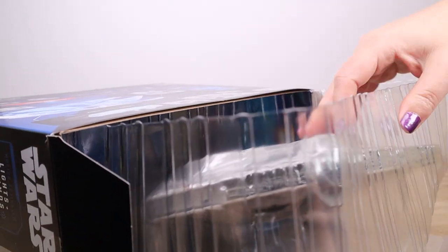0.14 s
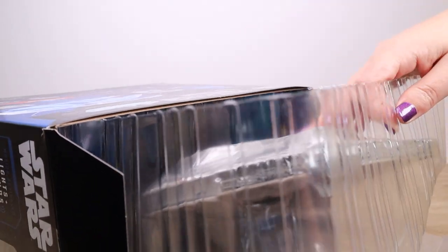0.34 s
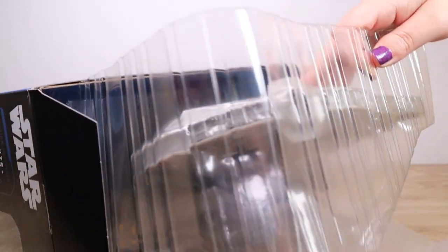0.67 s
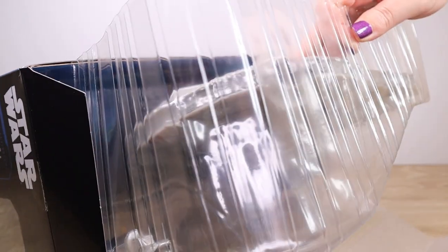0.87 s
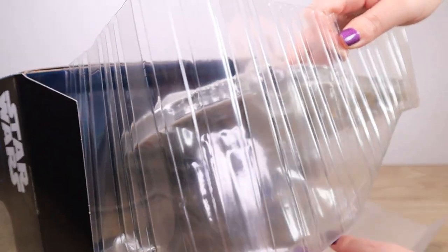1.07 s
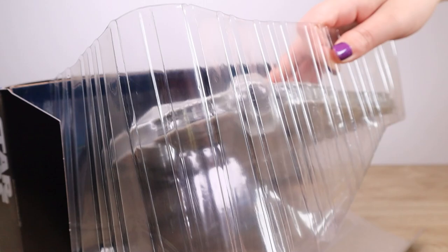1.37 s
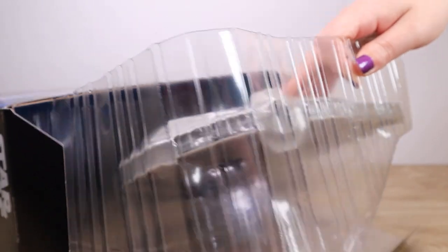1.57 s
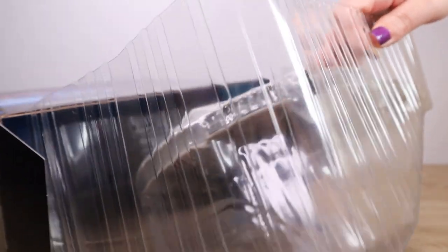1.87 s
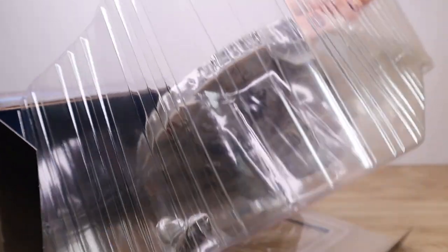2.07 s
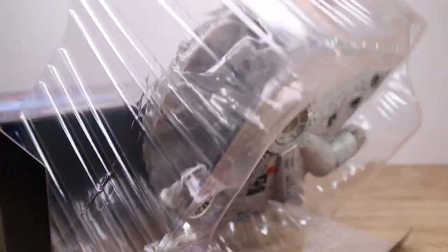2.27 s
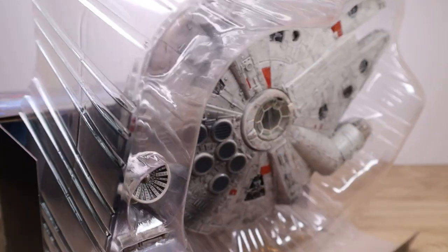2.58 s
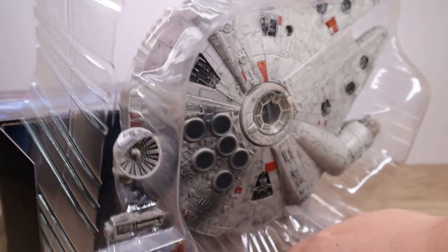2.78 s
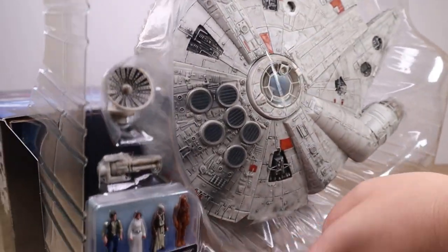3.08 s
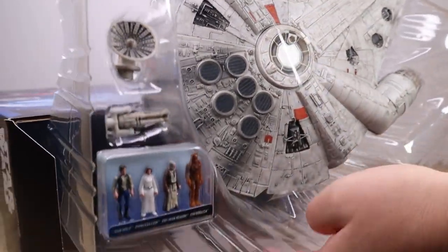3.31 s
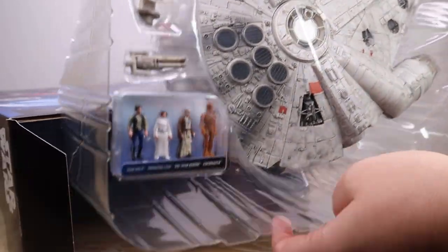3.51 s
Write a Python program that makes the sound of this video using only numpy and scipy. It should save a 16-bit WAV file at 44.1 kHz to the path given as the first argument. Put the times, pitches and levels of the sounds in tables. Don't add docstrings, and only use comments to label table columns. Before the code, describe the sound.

A thin plastic tray is pulled from a cardboard box: faint ticks and one sharp click, then louder scraping and popping, a brief lull, and hard final snaps; close microphone, small room.

```python
import sys
import numpy as np
from scipy import signal
from scipy.fft import rfft, irfft
from scipy.io import wavfile

SR = 44100
rng = np.random.default_rng(int(sys.argv[2]) if len(sys.argv) > 2 else 0)


def transcribe(signal):
    frames = np.atleast_2d(signal).T
    limited = np.clip(frames, -1, 1)
    pcm = np.round(limited * 32767).astype(np.int16)
    wavfile.write(sys.argv[1], SR, pcm)


def undo_db(level):
    steps = np.asarray(level, float) / 20
    return 10 ** steps


N = 160965
SPAN = 8192
SLIPS_PER_S = 6000
BOX_FLOOR_HZ = 194
SHINE_TOP_HZ = 7120


def ring(x, hz, width):
    b, a = signal.iirpeak(hz, hz / max(width, 4), fs=SR)
    return signal.lfilter(b, a, x)


def body(x, peaks):
    return sum((-1) ** k * undo_db(db) * ring(x, hz, w) for k, (hz, w, db) in enumerate(peaks))


def band(x, kind, hz, order=2):
    return signal.sosfilt(signal.butter(order, hz, kind, fs=SR, output="sos"), x)


def level(x, db, size=None):
    return x * undo_db(db) / np.sqrt(np.mean(x[:size] ** 2) + 1e-18)


def slips(shape, rate):
    chance, sign, size = np.moveaxis(rng.random(shape + (3,)), -1, 0)
    spread_db = 2
    return (chance < rate / SR) * np.sign(sign - .5) * undo_db(-spread_db * np.log(1 - size))


def add(out, s, x):
    i = max(int(s * SR), 0)
    out[i:i + len(x)] += x[:N - i]


# frequency in Hz, density in dB per Hz.
AIR_SPECTRUM = [(30, -22), (110, 13.5), (300, 3), (900, 7), (2700, -1), (6500, -7.5), (8500, -15.5),
                (15500, -22)]


def air():
    curve_hz, curve_db = np.array(AIR_SPECTRUM).T
    log_hz = np.log(np.arange(N // 2 + 1) * SR / N + 1)
    gain = undo_db(np.interp(log_hz, np.log(curve_hz), curve_db))
    hiss = level(irfft(rfft(rng.standard_normal(N)) * gain, N), -57.5)
    flicker = level(band(rng.standard_normal(N), "low", 42), 0)
    hum = undo_db(-67.5) * np.sin(2 * np.pi * 47.8 * np.arange(N) / SR)
    return hiss * undo_db(2.0 * flicker) + hum


def room(x):
    treble_t60_s, bass_t60_s = 0.25, 0.57
    build_s, early_end_s, early_fade_s = 0.016, 0.068, 0.0062
    room_db, late_db = -9, -20.5
    t = np.arange(SPAN) / SR
    noise = rng.standard_normal(SPAN)
    treble = band(noise, "high", 1240) * undo_db(-60 * t / treble_t60_s)
    bass = band(noise, "low", 815) * undo_db(-60 * t / bass_t60_s)
    early = 1 / (1 + np.exp(np.clip((t - early_end_s) / early_fade_s, -30, 30)))
    tail = (treble + bass) * np.clip(t / build_s, 0, 1) * (undo_db(late_db) + early)
    return signal.fftconvolve(x, tail * undo_db(room_db) / np.sqrt(np.sum(tail ** 2)))[:N]


# frequency in Hz, width in Hz, gain in dB.
WALL_MODES = [(215, 185, -8), (270, 135, -1), (346, 111, -1), (384.7, 72, -3.5), (510, 76, -5)]


def walls(x):
    return band(body(x, WALL_MODES), "high", BOX_FLOOR_HZ, order=4)


# frequency in Hz, width in Hz, gain in dB.
BOTTOM_MODES = [(92, 41, -7.5), (135.6, 71, 2), (167.7, 89, 1.5)]


def bottom(x):
    return band(body(x, BOTTOM_MODES), "high", 85, order=3)


# time in seconds, level in dB.
DRAG_LEVELS = [(0, -57.5), (.14, -59.5), (.5, -65.5), (.93, -61), (1.25, -64.5), (1.55, -57.5), (1.66, -36),
               (1.8, -40), (2.1, -40.5), (2.4, -36), (2.48, -27), (2.7, -48.5), (2.82, -66.5),
               (3.18, -56.5), (3.3, -49), (3.46, -44.5), (3.55, -52), (3.62, -32.5)]


def drag():
    push = slips((N,), 900)
    wall = level(ring(band(walls(push), "low", 600), 355.5, 180), 0)
    boom = level(bottom(push), -14.5)
    plate = level(band(body(push, TRAY_MODES), "low", 1500), -12)
    times, levels_db = np.array(DRAG_LEVELS).T
    return (wall + boom + plate) * undo_db(np.interp(np.arange(N) / SR, times, levels_db))


# time in seconds, wall peak in dB, wall ring in Hz, bottom level in dB.
BOX_THUMPS = [(0.241, -34.5, 343, -44), (0.261, -24.5, 333, -33.5), (1.413, -27.5, 346, -38),
              (2.15, -36, 296, -32), (2.371, -37, 300, -27.5), (2.49, -25, 385, -46),
              (2.512, -29, 400, -10), (2.57, -37, 286, -14.5), (2.796, -37, 313, -43),
              (3.052, -33, 277, -42.5), (3.247, -20.5, 312, -61), (3.276, -14, 236, -55),
              (3.298, -15.5, 310, -17), (3.354, -22, 268, -16.5), (3.418, -29, 354, -20),
              (3.592, -7.5, 278, -16.5), (3.611, -10, 269, -18.5)]


def thumps():
    out, t = np.zeros(N), np.arange(SPAN) / SR
    thump_s, lead_s = 0.015, 0.006
    n = int(2 * thump_s * SR)
    for (s, db, hz, bottom_db), x in zip(BOX_THUMPS, rng.standard_normal((len(BOX_THUMPS), SPAN))):
        push = x * t * np.exp(-2 * t / thump_s)
        wall = ring(ring(push, hz, 107), hz, 205) + 0.49 * walls(push)
        boom = bottom(band(push, "low", 127))
        add(out, s - lead_s, level(wall, db - 11.5, n) + level(boom, bottom_db - 21, 2 * n))
    return out


def wavelets(rows, cycles, gain_db):
    out, t = np.zeros(N), np.arange(SPAN // 4) / SR
    for s, db, hz in rows:
        u = t * hz / cycles
        swell = u * np.exp(1 - u)
        add(out, s - cycles / hz, undo_db(db + gain_db) * swell * np.sin(2 * np.pi * hz * t))
    return out


# time in seconds, peak in dB, ring in Hz.
WALL_CATCHES = [(1.6915, -24.9, 352), (1.7139, -24, 406), (1.7262, -30.5, 430), (1.7531, -37, 337),
                (1.8484, -24, 360), (1.8696, -34, 327), (1.8968, -21, 368), (1.9152, -22.5, 366),
                (1.9956, -41, 394), (2.0198, -24.5, 404), (2.0542, -34.5, 405), (2.0998, -26.6, 376),
                (2.1227, -23.1, 350), (2.1467, -26.5, 401), (2.1728, -33, 352), (2.1916, -28, 330),
                (2.2096, -25.4, 386), (2.2361, -34, 330), (2.2573, -28, 304), (2.2706, -29, 393),
                (2.296, -32, 355), (2.3165, -33.5, 328), (2.3411, -30, 326), (2.3596, -23, 304),
                (2.3816, -34, 392), (2.4089, -21, 346), (2.4455, -28, 380), (2.4971, -20.9, 367),
                (2.5222, -16, 341), (2.5468, -31, 383), (2.5722, -24.5, 304), (2.5994, -36, 317)]


def catches():
    return band(wavelets(WALL_CATCHES, 1.807, -1), "high", BOX_FLOOR_HZ, order=4)


# frequency in Hz, width in Hz, gain in dB.
CLINK_MODES = [(2184, 140, -3.5), (3020, 160, -10), (3740, 115, -1.5), (4700, 55, -13), (6300, 210, -10.5)]


def clink():
    out, t = np.zeros(N), np.arange(SPAN) / SR
    clink_s = 0.013
    rattle = band(slips((SPAN,), 2 * SLIPS_PER_S), "low", SHINE_TOP_HZ)
    push = rattle * (t < clink_s) * np.sqrt(t)
    add(out, 1.115, level(body(push, CLINK_MODES), -31.5, int(clink_s * SR)))
    return out


# frequency in Hz, width in Hz, gain in dB.
SHINE_MODES = [(2380, 1000, 11), (3158, 1360, 13.5), (3650, 734, 13), (4200, 1300, 2), (5650, 1510, 8.5),
               (6190, 2870, 3), (6530, 410, -18)]


def shine(push, db):
    crisp = band(body(band(push, "high", 2070), SHINE_MODES), "low", SHINE_TOP_HZ, order=8)
    sheen_hz = 11750
    sheen = band(band(push, "high", SHINE_TOP_HZ), "low", sheen_hz, order=8)
    sheen = sheen + 0.056 * band(push, "high", sheen_hz)
    sheen_db = -21.5 + 0.025 * (db + 37)
    return crisp - undo_db(sheen_db) * sheen


# time in seconds, peak in dB, ring in Hz.
CREASE_TICKS = [(0.019, -42.5, 2900), (0.4214, -49, 2830), (0.615, -51, 2680), (0.9458, -37, 2310),
                (1.0342, -41, 2050), (1.3678, -43.5, 4000), (0.6102, -40, 1340), (1.7796, -31, 2400),
                (1.8861, -36, 2470), (2.387, -15.5, 4940), (2.412, -16.5, 2850), (2.5225, -26, 2800),
                (2.716, -46.5, 4870), (2.9237, -45, 6400), (3.263, -35, 4750), (3.2966, -23.5, 2380),
                (3.358, -31, 2500), (3.509, -49, 2500), (3.5974, -13.5, 5200), (.2605, -18.5, 5460),
                (3.577, -16.5, 3160), (3.601, -31, 5500), (2.259, -34.5, 3550)]


def ticks():
    out, t = np.zeros(N), np.arange(SPAN // 4) / SR
    tick_s = 0.003
    n = int(2 * tick_s * SR)
    for (s, db, hz), x in zip(CREASE_TICKS, slips((len(CREASE_TICKS), SPAN // 4), 2 * SLIPS_PER_S)):
        push, tick_db = x * np.exp(-t / tick_s), db - 8
        crackle = level(shine(push, tick_db), 0, n)
        crease = level(ring(ring(push, hz, 0.32 * hz), hz, hz / 2), 17, n)
        add(out, s, level(crackle + crease, tick_db, n))
    return out


# time in seconds, peak in dB, ring in Hz.
PANEL_POPS = [(1.632, -23, 1530), (1.7075, -28, 870), (1.7092, -9.5, 2240), (1.7252, -13.5, 1870),
              (2.0, -25, 940), (2.381, -19, 780), (2.3843, -11, 2480), (2.389, -10.5, 844),
              (2.3919, -13, 2460), (2.3968, -8, 810), (2.4003, -11, 1970), (2.4094, -11.5, 1760),
              (2.4163, -11, 2180), (2.4351, -16.5, 940), (2.4446, -22, 1660), (2.4708, -20.8, 780),
              (3.2469, -13, 976), (3.2535, -18.5, 730), (3.265, -12.5, 790), (3.2802, -15.5, 1970),
              (3.282, -27, 830), (3.2912, -8, 818), (3.3202, -26, 734), (3.581, -18, 2920),
              (3.582, -23, 1090), (3.5913, -3.5, 2620), (3.5943, -7.5, 780), (3.5986, -3, 1770),
              (3.6046, -7, 790), (3.6191, -21, 910)]


def pops():
    return wavelets(PANEL_POPS, 1.717, -5)


# frequency in Hz, width in Hz, gain in dB.
TRAY_MODES = [(647.4, 70, 14), (818, 20.3, 18.5), (1036, 12, 15), (1540, 197, 13), (1750, 66, 13.5),
              (2026, 140, 9), (2300, 42, 8.5), (2680, 194, 11)]


def plastic(push, length, db, hz, treble_db):
    n = int(length * SR) + 200
    width = 0.23 * hz
    panel = ring(ring(push, hz, width), hz, 3 * width)
    top_hz = max(1980 * undo_db(0.095 * (db + 23.5)), hz)
    around = band(band(body(push, TRAY_MODES), "high", 0.41 * hz), "low", top_hz)
    low = level(level(panel, 17, n) + level(around, 14.5, n), db, n)
    return low + level(shine(push, treble_db), treble_db, n)


# start in seconds, length in seconds, body in dB, ring in Hz, treble in dB.
TRAY_SCRAPES = [(0.0, 0.034, -51.5, 820, -71), (0.625, 0.033, -50, 1260, -65),
                (0.69, 0.023, -48.5, 720, -83), (0.876, 0.11, -39.5, 800, -51.5),
                (1.112, 0.039, -49.5, 1360, -44.5), (1.422, 0.1, -45.5, 815, -68),
                (1.525, 0.21, -41, 755, -55.5), (1.605, 0.061, -38.5, 1320, -44),
                (1.711, 0.13, -37, 807, -51.5), (1.854, 0.098, -36, 790, -55.5),
                (1.998, 0.013, -51, 870, -85), (2.118, 0.052, -43, 1340, -50.5),
                (2.235, 0.061, -33, 770, -48), (2.289, 0.15, -36.5, 786, -54.5),
                (2.358, 0.071, -22, 800, -29.5), (2.447, 0.12, -33.5, 910, -45.5),
                (2.534, 0.12, -42.5, 750, -60), (2.865, 0.11, -50.5, 1360, -58),
                (3.061, 0.052, -51, 700, -66), (3.203, 0.21, -36.5, 793, -47),
                (3.276, 0.042, -29, 710, -48), (3.334, 0.039, -40.5, 930, -47.5),
                (3.407, 0.09, -48.5, 1350, -62.5), (3.598, 0.046, -27, 760, -60),
                (3.532, 0.12, -47.5, 1370, -62), (1.683, 0.083, -37, 1580, -42),
                (0.725, 0.097, -85, 2610, -80), (1.054, 0.052, -73, 2190, -61.5),
                (2.083, 0.043, -60, 1500, -59), (.89, 0.089, -46.5, 2180, -63)]


def scrapes():
    out, t = np.zeros(N), np.arange(SPAN) / SR
    rows = zip(TRAY_SCRAPES, slips((len(TRAY_SCRAPES), SPAN), SLIPS_PER_S))
    for (s, length, db, hz, treble_db), x in rows:
        rise = t / 0.15
        fall = (length - t) / 0.81 + length / 2
        shape = np.clip(np.minimum(rise, fall) / length, 0, 1)
        add(out, s, plastic(x * shape ** 1.49, length, db, hz, treble_db))
    return out


# time in seconds, treble peak in dB, body level in dB, ring in Hz.
TRAY_SNAPS = [(0.0373, -36.5, -45, 790), (0.0843, -38.5, -37, 1570), (0.145, -51, -51.5, 830),
              (0.1735, -43, -51, 776), (0.2383, -36, -44.5, 1320), (0.2611, -15.5, -27.5, 1290),
              (0.4134, -47, -48.5, 744), (0.4674, -44, -46, 820), (0.6078, -39.5, -42, 1335),
              (0.6739, -38, -44, 818), (0.8601, -46, -50, 1000), (1.033, -39, -54, 2090),
              (1.4107, -39, -35, 780), (1.706, -14, -23, 810), (1.9919, -37.5, -32, 790),
              (2.4354, -17, -21.5, 1370), (2.5114, -26.5, -22, 600), (2.6494, -49, -37.5, 610),
              (2.6764, -51, -44.5, 620), (2.6998, -36, -39, 700), (2.794, -41, -40.5, 700),
              (2.9814, -57, -43.5, 620), (3.0016, -44, -42.5, 744), (3.0165, -35.5, -43.5, 710),
              (3.046, -28.5, -42.5, 670), (3.2445, -48, -27, 960), (3.2759, -11.5, -21, 820),
              (3.5749, -20.5, -20.5, 1240), (3.5892, -8.5, -11, 800), (1.6286, -28, -38.5, 1550)]


def snaps():
    out, t = np.zeros(N), np.arange(SPAN) / SR
    snap_s, rise_s = 0.014, 0.0009
    rows = zip(TRAY_SNAPS, slips((len(TRAY_SNAPS), SPAN), 3 * SLIPS_PER_S))
    for (s, treble_db, db, hz), x in rows:
        soft_rise_s = rise_s * undo_db(-0.17 * (treble_db + 11))
        push = x * np.minimum(t / soft_rise_s, 1) * np.exp(-t / snap_s)
        add(out, s - rise_s, plastic(push, snap_s, db - 2.5, hz, treble_db - 16.5))
    return out


def scene():
    box = drag() + thumps() + catches()
    tray = clink() + ticks() + pops() + scrapes() + snaps()
    near = box + tray
    return (near + room(near) + air())[None]


def roll_off(x):
    return signal.sosfilt(signal.butter(12, 15820, fs=SR, output="sos"), x)


def record(dry):
    mix = np.tanh(dry)
    return roll_off(mix)


dry = scene()
out = record(dry)
transcribe(out)
```